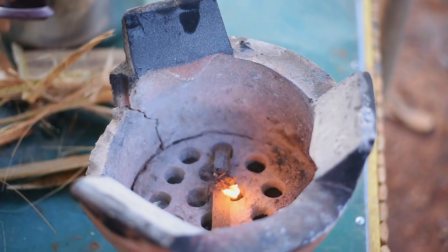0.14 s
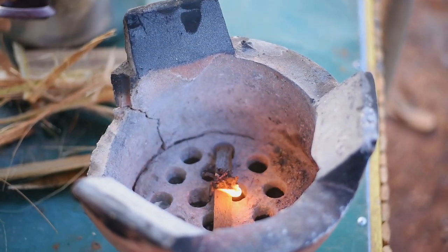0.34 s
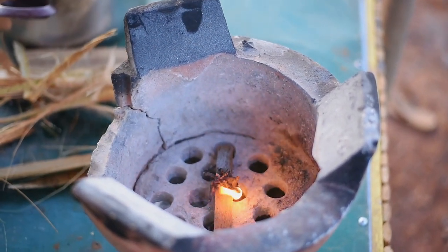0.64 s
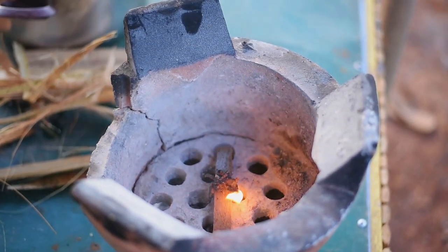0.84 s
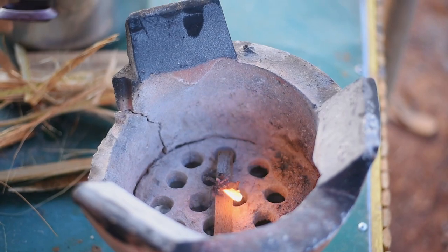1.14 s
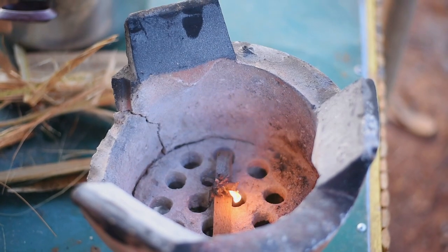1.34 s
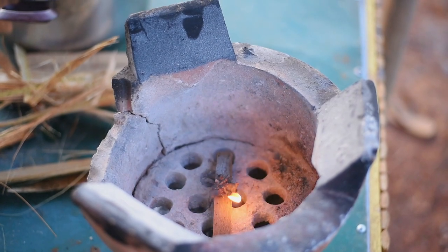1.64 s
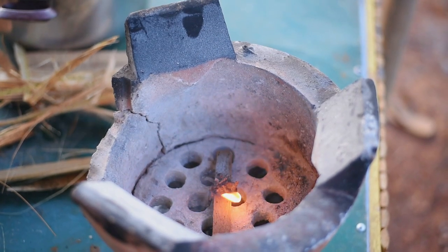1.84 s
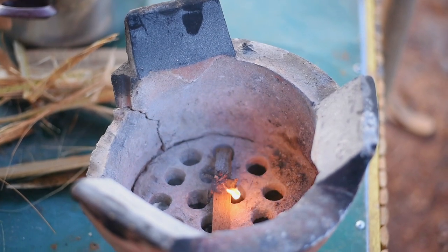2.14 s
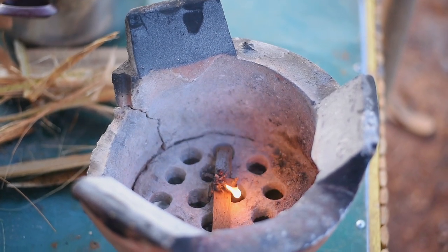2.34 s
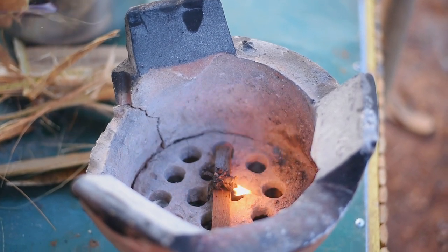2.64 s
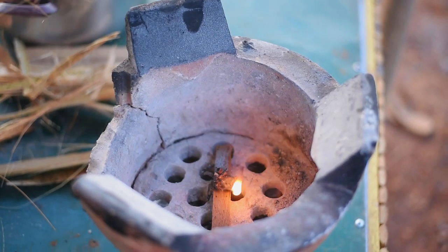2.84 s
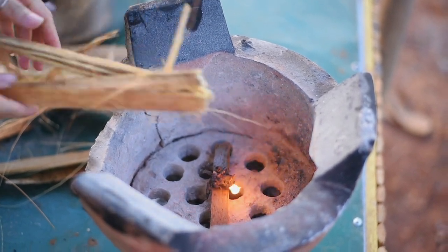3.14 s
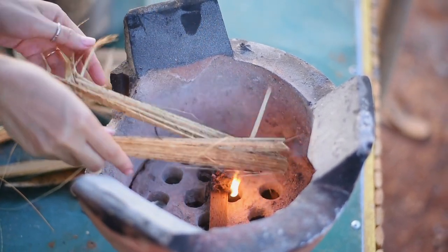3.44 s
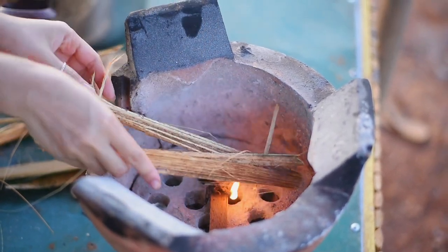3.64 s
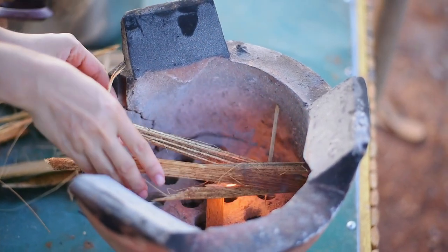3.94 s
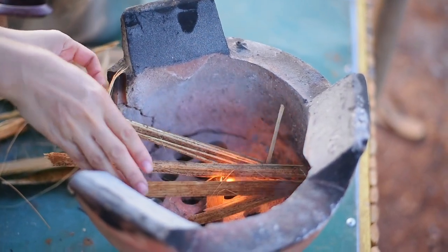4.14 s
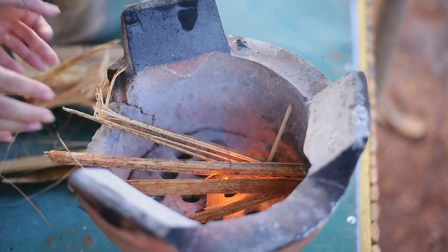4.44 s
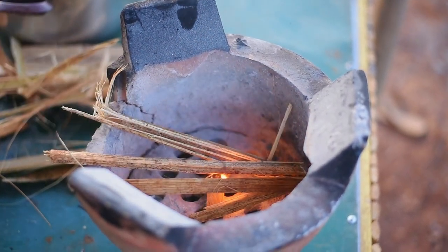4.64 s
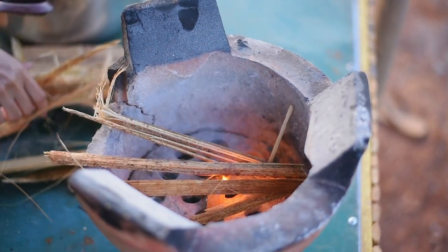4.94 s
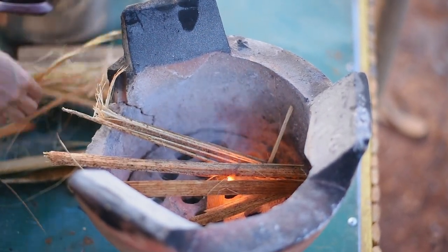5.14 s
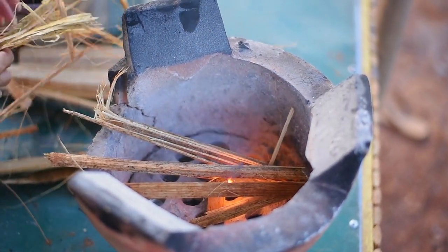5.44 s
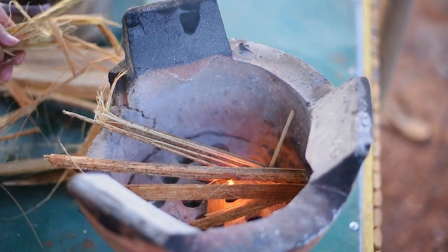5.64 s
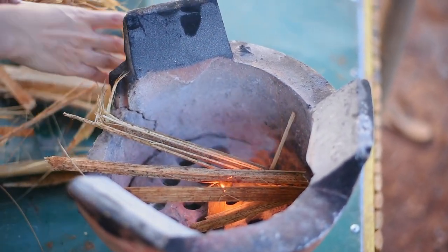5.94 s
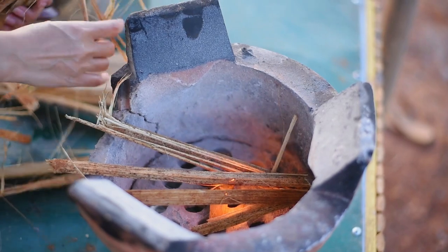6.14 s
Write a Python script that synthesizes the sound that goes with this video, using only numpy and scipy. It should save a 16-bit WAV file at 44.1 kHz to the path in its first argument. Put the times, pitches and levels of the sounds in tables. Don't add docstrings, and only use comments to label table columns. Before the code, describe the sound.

Outdoors, close stereo pickup, with a faint low machine drone and thin whine running throughout. From 0 to 0.2 s dry straw is crushed in a dense, bright burst of rustle and sharp cracks. After a brief lull, loud crackling squeezes come at about 0.7 and 0.9 s, then a cluster of hard stalk snaps at 1.23, 1.3, 1.48 and 1.6 s, some ringing briefly, fading by 2 s. From then on it is much quieter: soft rustles and lone ticks, with a clear snap at 2.93 s. A tiny cricket chirp comes at 3.1 s. Sticks knock dully on clay around 3.9 and 4.14 s, with low flame flutter. Faint chirps repeat from 4.4 to 5 s. A dry stick clacks sharply at 5.24 s, followed by airy puffs, soft thuds and faint low sliding hums until 6.3 s.

```python
import sys
import numpy as np
from scipy import signal
from scipy.fft import rfft, irfft, next_fast_len
from scipy.io import wavfile
from scipy.ndimage import uniform_filter1d, map_coordinates

SR = 44100
rng = np.random.default_rng(int(sys.argv[2]) if len(sys.argv) > 2 else 0)


def unload_wav(signal):
    wavfile.write(
        sys.argv[1],
        SR,
        np.round(np.clip(np.atleast_2d(signal).T, -1, 1) * 32767).astype(np.int16),
    )


def to_linear_factor(level_db):
    exponent = np.asarray(level_db, float) / 20
    return 10 ** exponent


N = 277830
LAG = 4

# (frequency [Hz], density [dB per Hz])
STRAW = [(2500, -35), (4000, -13.5), (5500, -9.5), (6500, -7.5), (7600, -1.5), (8500, -1.5), (9600, -3),
         (11000, -7), (12000, -10), (14500, -10), (15800, -28)]
# (frequency [Hz], density [dB per Hz])
STEM = [(900, -25.5), (1600, -15), (2400, -5.5), (3300, -5.5), (4400, -3), (5500, -4.5), (7000, -7.5),
        (12000, -48)]
# (frequency [Hz], density [dB per Hz])
WOOD = [(250, -22), (600, -3.5), (1100, 3), (2000, 6), (4000, -11)]
# (time [s], peak level [dB], frequency [Hz])
KNOCKS = [(3.881, -34, 408), (3.879, -35.5, 1710), (4.137, -35, 747), (4.139, -31.5, 1080),
          (4.138, -33, 1760), (4.145, -31, 245), (4.589, -34.5, 1480), (5.237, -38, 1060),
          (5.601, -30, 425), (5.676, -31, 235), (6.064, -35.5, 238), (6.285, -34, 434)]


def unit(x):
    return x / np.sqrt(np.mean(x ** 2) + 1e-20)


def along(points, hz):
    f, v = np.transpose(points)
    return np.interp(np.log(hz + 1), np.log(f + 1), v)


def curves(rows):
    s, *cols = np.transpose(rows)
    return [np.interp(np.arange(N) / SR, s, c) for c in cols]


def wobble(rate):
    knots = rng.standard_normal(int(N * rate / SR) + 4)
    return map_coordinates(knots, [np.arange(N) * rate / SR])


def filtered(x, response):
    m = next_fast_len(N + 8192)
    return irfft(rfft(x, m) * response(np.fft.rfftfreq(m, 1 / SR)), m)[..., :N]


def coloured(x, spectrum):
    cep = irfft(np.log(to_linear_factor(along(spectrum, np.fft.rfftfreq(2048, 1 / SR))) + 1e-6))
    cep[1:1024] *= 2
    cep[1025:] = 0
    kernel = irfft(np.exp(rfft(cep)))
    return signal.fftconvolve(x, kernel[None] / np.linalg.norm(kernel), axes=1)[:, :N]


def patchy(x, depth_db, size=256, smooth=(8, 5)):
    z = signal.stft(x, nperseg=size)[2]
    field = uniform_filter1d(rng.standard_normal(z.shape[1:]), size=smooth[0], axis=0)
    field = uniform_filter1d(field, size=smooth[1], axis=1)
    return signal.istft(z * to_linear_factor(depth_db * unit(field)), nperseg=size)[1][:, :N]


def rush(gain, patchy_db):
    # (frequency [Hz], left-right correlation)
    alike = [(40, .85), (130, .89), (290, .85), (640, .32), (1410, .18), (3100, .1), (6800, .02)]
    pair = patchy(rng.standard_normal((2, N)), patchy_db, size=512, smooth=(6, 14))

    def split(hz):
        turn = np.arccos(np.clip(along(alike, hz), -1, 1)) / 2
        return gain(hz) * [np.cos(turn), np.sin(turn)]

    mid, side = filtered(pair, split)
    return unit(np.array([mid + side, mid - side]))


def bursts(at, gains, t60, shared, size):
    t = np.arange(size)
    fade = to_linear_factor(-60 * t / SR / t60)
    common, left, right = rng.standard_normal((len(at), 3, size)).transpose(1, 0, 2)
    out = []
    for gain, own, lag in zip(gains, (left, right), (0, LAG)):
        wave = (np.sqrt(shared) * common + np.sqrt(1 - shared) * own) * fade
        equal = np.linalg.norm(fade) / np.linalg.norm(wave, axis=1)
        wave *= (gain * equal)[:, None]
        where = (at[:, None] + t + lag).ravel()
        out.append(np.bincount(where, wave.ravel(), N + size + LAG)[:N])
    return np.array(out)


def sides(pan_db):
    return to_linear_factor(np.array([pan_db / 2, -pan_db / 2]))


def samples(s):
    return np.round(s * SR).astype(int)


def swell(s, length):
    return np.exp(-((np.arange(N) / SR - s) / (length / 2)) ** 4)


def strokes(rows, db, rest_db):
    t = np.arange(0, N + 64, 64) / SR
    s, rise, fall = np.transpose(rows)[:3, :, None]
    away = np.maximum((s - t) / np.abs(rise), (t - s) / np.abs(fall))
    power = np.sum(to_linear_factor(db[:, None] - 20 * away) ** 2, axis=0) + to_linear_factor(rest_db) ** 2
    return np.interp(np.arange(N) / SR, t, np.sqrt(power))


def machine():
    # (frequency [Hz], wander [Hz], level [dB])
    hum = [(115.1, 2.94, -50), (163.4, 1.55, -50)]
    # (frequency [Hz], width [Hz], density [dB per Hz])
    whine = [(232, 86, -2), (600, 25, -10), (1080, 28, -11.5), (1436, 70, -4.5), (1802, 68, -3.5),
             (2283, 116, 1.5), (10600, 1600, -19.5)]
    skew = 0.12 * wobble(12) * [[1], [-1]]
    drone = 0
    for hz, wander_hz, db in hum:
        level = to_linear_factor(db + 3.5 + 0.56 * wobble(30))
        turns = np.cumsum(hz + wander_hz * wobble(30)) / SR
        drone = drone + level * np.sin(2 * np.pi * turns + skew)

    def casing(f):
        return sum(to_linear_factor(db) / (1 + ((f - hz) / (width / 2)) ** 2) for hz, width, db in whine)

    return drone + to_linear_factor(-50.0 + 1.7 * wobble(5.98)) * rush(casing, patchy_db=1.65)


def yard():
    # (frequency [Hz], density [dB per Hz])
    air = [(15, -38), (30, -13.5), (60, -12.5), (100, -5.5), (200, -8.5), (350, -23), (900, -23.5),
           (2240, -17.5), (3100, -26.5), (5000, -29), (11000, -31), (12200, -45), (15600, -37)]
    # (time [s], rumble level [dB])
    flame_levels = [(0, -60), (1, -60), (1.7, -57), (3.1, -54), (3.7, -60), (4.16, -49), (4.9, -63),
                    (5.1, -52), (6.3, -57)]
    # (peak time [s], rise [s], fall [s], level [dB])
    puffs = [(0.648, .07, 0.46, -50), (1.3, 0.11, 0.39, -46), (1.62, 1.1, .4, -49), (2.6, 2.1, 1.9, -67),
             (3.44, 0.85, .9, -59), (3.89, 0.065, .13, -48), (4.16, 0.22, .09, -50),
             (4.97, 0.026, 1.2, -49), (5.25, 0.055, 0.13, -39), (5.45, .15, 0.21, -42.5),
             (5.61, 0.2, 0.18, -39), (5.8, 0.27, 3, -51), (6.3, .21, 0.11, -44)]

    def hump(centre_hz, width):
        return lambda f: np.exp(-(np.log((f + 1) / centre_hz) / width) ** 2)

    flame_db, = curves(flame_levels)
    floor = to_linear_factor(-45.5) * rush(lambda f: to_linear_factor(along(air, f)), patchy_db=1.5)
    flame = to_linear_factor(flame_db + 2.5) * rush(hump(55, 0.44), patchy_db=3.0)
    draught = rush(hump(420, 2.07), patchy_db=4.0)
    draught_gain = to_linear_factor(-7) * strokes(puffs, np.array(puffs)[:, -1], rest_db=-86.5)
    return floor + flame + draught_gain * draught


def grains(scatter_db, clump_db, t60, count, size):
    draw = rng.random((count, 2))
    at = (draw[:, 0] * N).astype(int)
    size_db = np.minimum(-scatter_db * np.log(1 - draw[:, 1]), 11) + clump_db * wobble(90)[at]
    x = bursts(at, np.tile(to_linear_factor(size_db), (2, 1)), t60, shared=0.11, size=size)
    slow = uniform_filter1d(np.mean(x ** 2, axis=0), size=2500)
    return x / np.sqrt(np.abs(slow) + 1e-12)


def rustle():
    # (peak time [s], rise [s], fall [s], rustle level [dB], stems over it [dB])
    squeezes = [(0.0, .05, 0.13, -26, -15), (.037, .004, 0.084, -27, -28), (.072, .005, 0.097, -25.5, -22),
                (.092, 0.082, 0.11, -17.5, -17), (.134, 0.098, 0.07, -20.5, -10),
                (.22, .1, 0.12, -39, -0.5), (.373, 0.071, 0.28, -39, -9), (.475, 0.042, 0.16, -39, -4.5),
                (.642, 0.0087, 0.055, -32, -11), (0.688, 0.042, 0.11, -15, -15.5),
                (.81, 0.058, 0.038, -23.5, -14.5), (.86, .1, 0.13, -32, -10),
                (.91, 0.034, 0.031, -18, -4.5), (1.096, 0.096, 0.16, -38, -6.5),
                (1.15, .15, 0.21, -41, -22), (1.222, 0.024, .03, -26.5, -9),
                (1.243, 0.028, 0.044, -20, -11), (1.3, .04, 0.08, -29.5, -7.5),
                (1.411, 0.08, .08, -36.5, -11), (1.468, 0.026, 0.12, -31.5, -7.5),
                (1.592, 0.12, 0.19, -31, -10), (1.66, 0.12, 0.24, -41.5, -4),
                (1.78, 0.23, 0.23, -40, -10.5), (1.968, .07, .08, -41.5, -7), (2.043, 0.06, 0.16, -33, -8)]
    # (peak time [s], rise [s], fall [s], rustle [dB], stems over it [dB])
    shifts = [(2.31, .25, 0.27, -49.5, -16), (2.424, 0.21, 0.048, -41, -6), (2.534, 0.084, 0.19, -38.5, -5),
              (2.59, .1, 0.13, -49, -22), (2.758, 0.15, 0.13, -45, -6), (2.92, 0.37, .1, -47.5, -2),
              (2.942, 0.018, 0.1, -39, -3), (3.227, 0.59, .21, -51.5, -13), (3.287, 0.072, 0.11, -46, -3),
              (3.36, .1, 0.29, -64, -12), (3.62, 0.73, 0.65, -55, -6), (4.1, 0.61, 0.63, -51, -8),
              (5.072, 0.17, 0.13, -45.5, 1.5), (5.116, 0.12, .15, -42.5, -14),
              (5.17, 0.042, 0.074, -46.5, 3.5), (5.264, .08, 0.31, -46, -3), (5.4, .3, 0.54, -54.5, -4),
              (5.61, 0.1, 0.12, -49.5, -1.5), (5.719, 0.14, 0.11, -42, -3), (5.9, 0.97, 2.1, -51, -5),
              (6.076, 0.1, .8, -47.5, -6), (6.3, 0.28, .1, -41.5, -1.5)]
    # (time [s], left-right difference [dB])
    hand = [(0, 2.5), (.7, 3.5), (.95, 2), (1.15, 4), (1.257, 0), (1.32, 3), (2.1, 3), (3.3, 1), (6.3, 2.1)]
    rows = np.array(squeezes + shifts)
    db, stem_db = rows.T[-2:]
    fine = coloured(grains(scatter_db=1.6, clump_db=0.3, t60=0.0016, count=20000, size=32), STRAW)
    thick = coloured(grains(scatter_db=-0.5, clump_db=1.5, t60=0.012, count=10000, size=64), STEM)
    fine_gain = strokes(rows, db, rest_db=-79)
    thick_gain = strokes(rows, db + stem_db, rest_db=-80)
    pan_db, = curves(hand)
    return sides(pan_db) * (fine_gain * fine + thick_gain * thick)


def snaps():
    # (time [s], peak [dB], stem over it [dB],
    # left-right [dB])
    stalk_snaps = [(.0014, -21.5, -29, 2), (.0074, -25, -33, 1), (0.0238, -18, -36, 0),
                   (0.0356, -8, -40, 6), (0.0443, -5.5, -42, 0.5), (.0522, -17, -29, 3),
                   (0.0702, -8, -29, 4), (.0799, -15, -22, 7), (.3207, -30, -11, 1), (.4644, -24.5, -15, 2),
                   (.498, -35, -15, 2), (0.639, -18.5, -10, 2.5), (0.7696, -9.5, -19.5, 1),
                   (.776, -25, -17, -3), (0.81, -16, -28, 2), (.852, -11.5, -35, 2), (0.862, -10, -33, 3),
                   (.8862, -25, -17, 2.5), (0.9118, -18, -21, -2), (1.0208, -35, -27, 4),
                   (1.052, -29, -9, 5.5), (1.0861, -30.5, -4, 7), (1.161, -30, -27, 2),
                   (1.177, -37, -27, 2),
                   (1.2165, -22, -8, 4), (1.223, -16, -28, 8), (1.234, -5, -23, 6), (1.2354, -9, -21, 2.5),
              (1.2381, -9, -28, 10), (1.2423, -15, -28, -11), (1.295, -21, -32, 7), (1.3, -3, -22.5, 0),
              (1.3058, -14, -19, 8), (1.3779, -13.5, -19.5, 2), (1.4772, -7.5, -19.5, 1),
              (1.5219, -15, -17, 9), (1.5257, -12, -22, -4), (1.5998, -2, -18, 3.5), (1.607, -12, -16, 3),
              (1.6204, -8, -20, 4), (1.67, -14, -13.5, 4), (1.768, -29, -20, 3), (1.7734, -18, -13.5, 3),
              (1.7935, -11, -20, 2.5), (1.9352, -20.5, -30, 4), (1.9452, -29, -21, 1),
              (1.951, -25, -25, 2.5), (2.004, -22, -22, 0), (2.034, -23, -25, 1)]
    # (time [s], peak [dB], stem over it [dB], left-right [dB])
    ticks = [(2.2494, -28, -19.5, 2), (2.3776, -35, -20, -3), (2.427, -34, -5, -2), (2.492, -38, -18, -9),
             (2.666, -34, -11, -2), (2.7486, -39, -31, 3), (2.881, -32.5, -6, 4), (2.9324, -16, -14.5, 2),
             (2.9342, -25, -12, 6), (2.9445, -25, -12, 0), (2.9643, -27.5, -4.5, 4), (3.0095, -26, -14, 1),
             (3.2764, -35, -5, -1), (3.6381, -45, 2.5, 6), (3.6543, -33, -14, 0), (3.881, -35.5, -11, -1),
             (4.1369, -39, -3, -3), (5.158, -32, -9, 1), (5.241, -14.5, -12, 1.5), (5.346, -39, -9, -1),
             (5.8593, -27.5, -16, 0), (6.0714, -31, -12, 0), (6.0747, -34.5, -6, 6), (6.256, -29, -31, -7)]
    # (frequency [Hz], density [dB per Hz])
    crack_colour = [(1760, -44), (3000, -31), (5300, -6.5), (6400, -6.5), (8340, 0), (11100, -9.5),
                    (14200, -9), (15800, -15.5)]
    s, db, stem_db, pan_db = np.transpose(stalk_snaps + ticks)
    at, pan = samples(s), sides(pan_db)
    gains = to_linear_factor(db) * pan
    crack = coloured(bursts(at, gains, t60=0.005, shared=0.46, size=256), crack_colour)
    stem = bursts(at, gains * to_linear_factor(stem_db - 1.5), t60=0.065, shared=0.16, size=768)
    pop = to_linear_factor(0.5) * (to_linear_factor(-44) + to_linear_factor(db - 55))
    wood = bursts(at, pan * pop, t60=0.049, shared=0.73, size=1024)
    tail = bursts(at + 60, pan * to_linear_factor(-17.5 + 0.76 * db), t60=0.073, shared=0.28, size=2048)
    tail = tail * to_linear_factor(np.clip(4.3 * wobble(600), -14, 5))
    return crack + coloured(stem, STEM) + coloured(wood, WOOD) + coloured(tail, STRAW)


def crackles():
    # (time [s], peak level [dB], left-right difference [dB])
    fibres = [(0.0476, -8, 0), (0.064, -15, 11), (0.0821, -7.5, 6), (0.0909, -8, 5), (0.1302, -17, 6),
              (0.1349, -13, 5), (0.1863, -29, -2), (0.2153, -30, 2), (0.2177, -30, 8), (0.4653, -28, 2),
              (0.6591, -21, 10), (0.6706, -10, 10), (0.6762, -11, 13), (0.683, -9, 9), (0.6908, -8, 4),
              (0.713, -7, 4), (0.7462, -18, 7), (0.7835, -19, 0), (0.7993, -17, 2), (0.8015, -17, 1),
              (0.8164, -20, 2), (0.8209, -21, -1), (0.8384, -22, 8), (0.848, -25, 10), (0.8546, -19, 1),
              (0.865, -9, 6), (0.9283, -27, 4), (1.029, -21, 3), (1.063, -21, 7), (1.0913, -19, 13),
              (1.0933, -28, 2), (1.1052, -27, 5), (1.123, -24, 5), (1.1303, -21, 12), (1.1324, -20, 4),
              (1.1504, -18, 5), (1.1547, -24, 7), (1.219, -18, 7), (1.2276, -14, -1), (1.2867, -24, 1),
              (1.308, -12, -6), (1.3777, -9, 2), (1.418, -19, 9), (1.4588, -25, 0), (1.4609, -27, 11),
              (1.4711, -20, 7), (1.4733, -24, 5), (1.4847, -22, -8), (1.5295, -20, 2), (1.5375, -24, -4),
              (1.563, -25, 5), (1.5753, -28, 0), (1.5795, -21, 6), (1.6015, -8, 2), (1.6205, -19, 10),
              (1.6727, -30, 1), (1.6795, -27, 2), (1.6854, -30, 5)]
    # (frequency [Hz], density [dB per Hz])
    reed = [(2500, -34), (5000, -17), (7000, -6), (8600, 3), (10200, -7), (12500, -14), (15800, -21)]
    s, db, pan_db = np.transpose(fibres)
    gains = to_linear_factor(db - 1.5) * sides(0.66 * pan_db)
    return coloured(bursts(samples(s), gains, t60=0.0024, shared=0.28, size=256), reed)


def rings():
    # (time [s], peak level [dB], frequency [Hz], t60 [s])
    ring_notes = [(.9125, -21.5, 2440, 0.036), (1.2342, -6, 4400, 0.027), (1.2345, -19, 5860, .025),
                  (1.2355, -30.5, 2840, .09), (1.2995, -23.5, 1080, .016), (1.2998, -31, 770, 0.021),
                  (1.6, -28, 1140, 0.019), (1.602, -32, 795, 0.018), (1.605, -34, 560, 0.017),
                  (0.912, -33, 3100, .02), (.9, -24, 2870, .03), (1.67, -25.5, 3240, 0.041),
                  (2.9322, -17, 4660, 0.018), (2.9324, -31, 3100, .02), (2.9324, -23, 8160, .015),
                  (3.892, -39, 420, 0.076), (5.238, -35, 5000, .03), (5.266, -34, 4420, .06)]
    out, t = np.zeros(N + SR), np.arange(SR // 10) / SR
    for s, db, hz, t60 in ring_notes:
        fade = to_linear_factor(db - 60 * t / t60) * (1 - np.exp(-t / 0.00027))
        out[round(s * SR):][:len(t)] += fade * np.sin(2 * np.pi * hz * t)
    left, right = sides(2.5)
    return np.array([left * out[:N], right * np.roll(out, LAG)[:N]])


def cricket():
    # (time [s], length [s], level [dB], frequency [Hz])
    chirps = [
        (3.129, .09, -57.5, 4500),
        (4.393, .09, -57, 4700),
        (4.612, 0.093, -55.5, 4700),
        (4.815, 0.1, -54.5, 4680),
        (4.993, 0.055, -60, 4600),
    ]
    t, out = np.arange(N) / SR, np.zeros((2, N))
    for s, length, db, hz in chirps:
        noise = rng.standard_normal((2, N))
        note = unit(filtered(noise, lambda f: np.exp(-((f - hz) / 300) ** 2)))
        wing = 0.74 + np.cos(np.pi * 27 * (t - s)) ** 2
        out += to_linear_factor(db) * swell(s, length) * wing * note
    return out


def knocks():
    # (frequency [Hz], level [dB], t60 [s])
    stick_modes = [(2440, -24, 0.083), (3540, -4.5, 0.052), (4420, -2, 0.033), (5270, -20, 0.04)]
    # (time [s], level [dB])
    stick_hit = (5.24, -22.5)
    partials = ((1, 1), (1.75, 0.53), (2.5, 0.38))
    out, t = np.zeros(N + SR), np.arange(SR // 5) / SR
    for s, db, hz in KNOCKS:
        note = sum(share * np.sin(2 * np.pi * ratio * hz * t) for ratio, share in partials)
        fade = to_linear_factor(db - 8.0 - 60 * t / 0.069) * (1 - np.exp(-t / 0.00017))
        out[round(s * SR):][:len(t)] += fade * note
    ring = sum(to_linear_factor(db - 60 * t / t60) * np.sin(2 * np.pi * hz * t) for hz, db, t60 in stick_modes)
    out[round(stick_hit[0] * SR):][:len(t)] += to_linear_factor(stick_hit[1]) * ring
    return out[:N] * sides(.6)[:, None]


def thuds():
    s, db, _ = np.transpose(KNOCKS)
    gains = np.tile(to_linear_factor(db - 8), (2, 1))
    return coloured(bursts(samples(s), gains, t60=0.052, shared=0.95, size=1024), WOOD)


def drags():
    # (time [s], length [s], level [dB], frequency [Hz])
    slides = [
        (4.21, .15, -60.5, 374),
        (5.49, .22, -54, 335),
        (5.52, .26, -60, 745),
        (5.79, .1, -59, 490),
        (5.62, .3, -58, 440),
        (5.95, .7, -61, 270),
        (5.63, .12, -53, 380),
        (5.83, .14, -58.5, 371),
        (5.966, .07, -56, 411),
    ]
    out = np.zeros(N)
    for s, length, db, hz in slides:
        noise = rng.standard_normal(N)
        band = unit(filtered(noise, lambda f: np.exp(-((f - hz) / 32) ** 2)))
        out += to_linear_factor(db + 2.3 * wobble(25)) * swell(s, length) * band
    return out


def scene():
    # (frequency [Hz], left-right difference [dB])
    shade = [(2000, -2.5), (12000, 0.5)]
    straw = patchy(rustle(), depth_db=1.66)
    straw = straw + snaps() + crackles() + rings()
    straw = filtered(straw, lambda hz: sides(along(shade, hz)))
    return machine() + yard() + straw + cricket() + knocks() + thuds() + drags()


def top_cut(x):
    return signal.sosfilt(signal.butter(12, 16350, fs=SR, output="sos"), x)


def record(dry):
    heard = filtered(np.clip(dry, -1, 1), lambda hz: hz < 16200)
    return top_cut(heard)


dry = scene()
out = record(dry)
unload_wav(out)
```